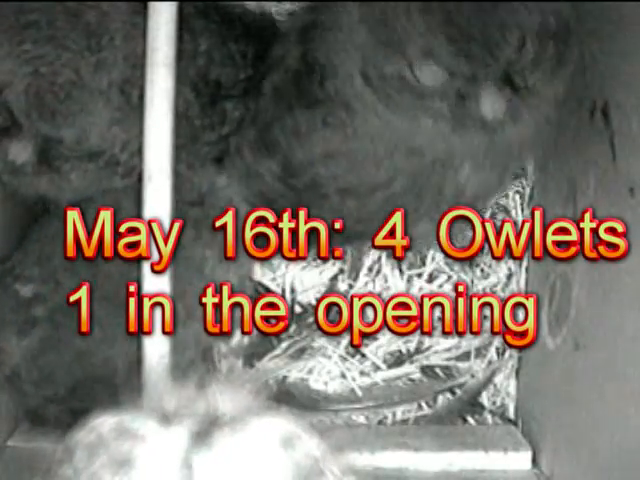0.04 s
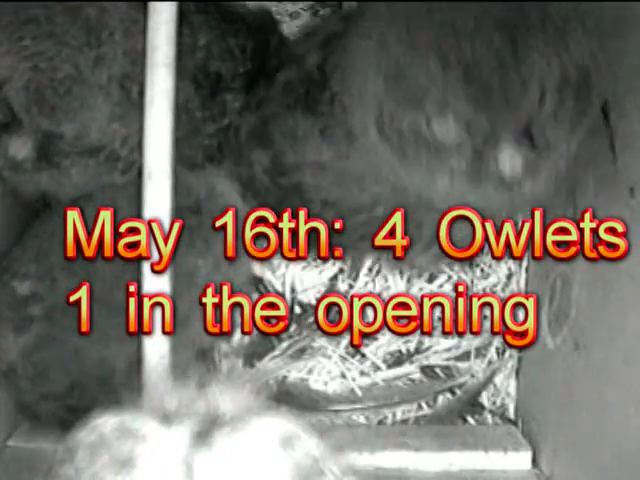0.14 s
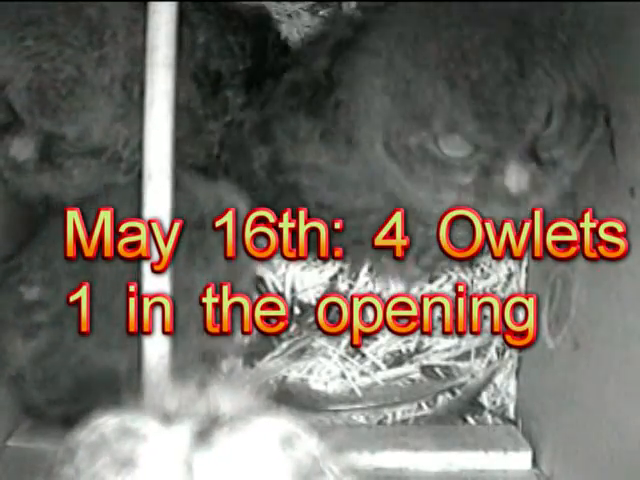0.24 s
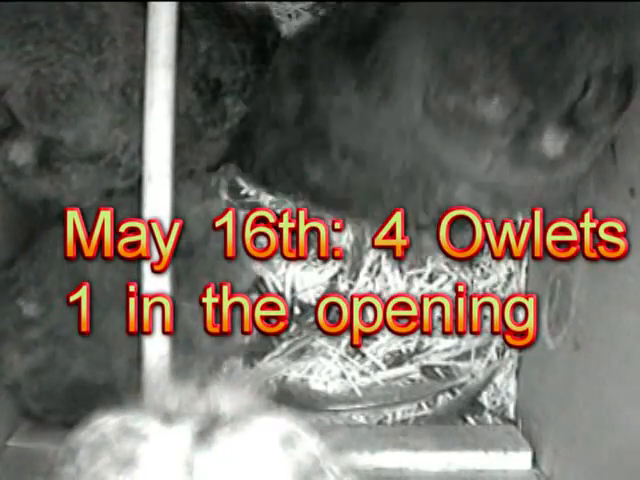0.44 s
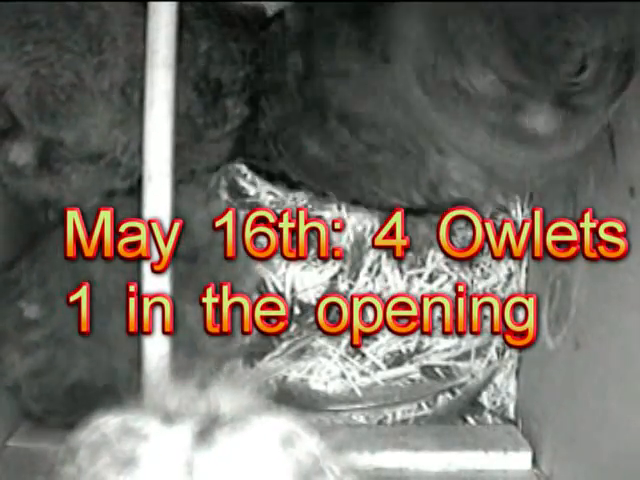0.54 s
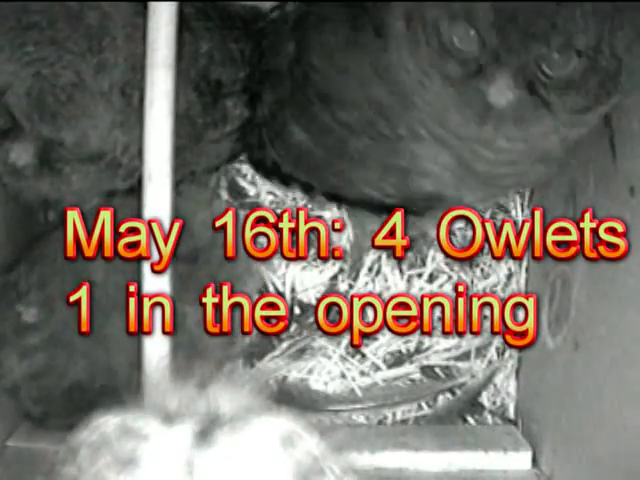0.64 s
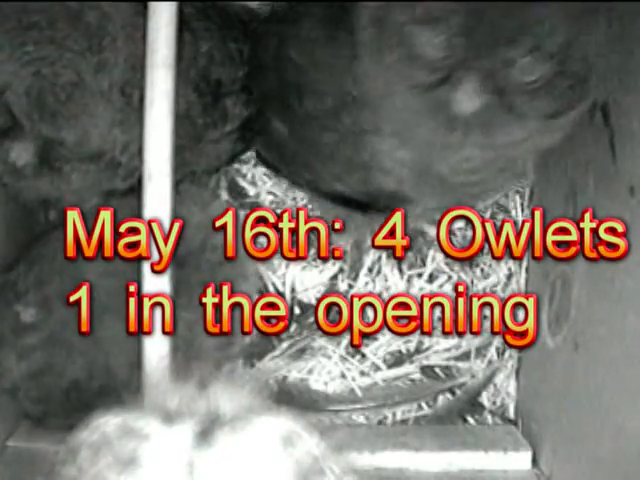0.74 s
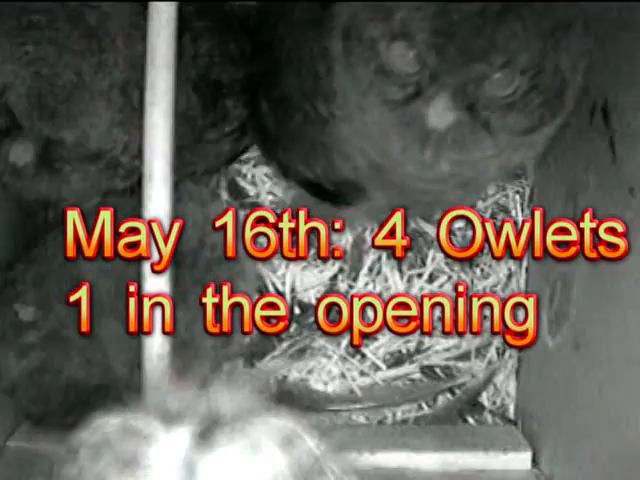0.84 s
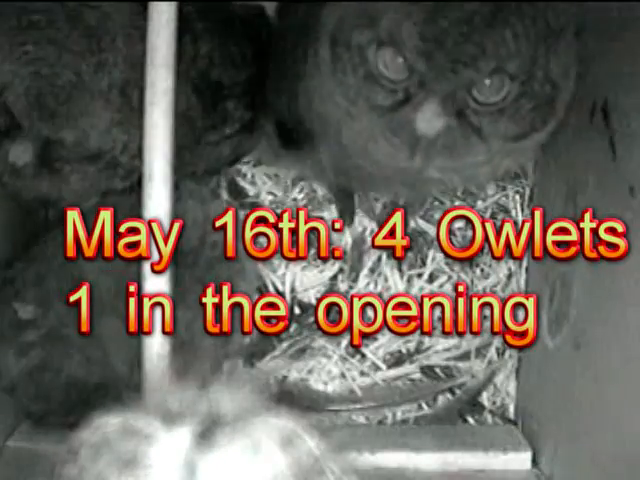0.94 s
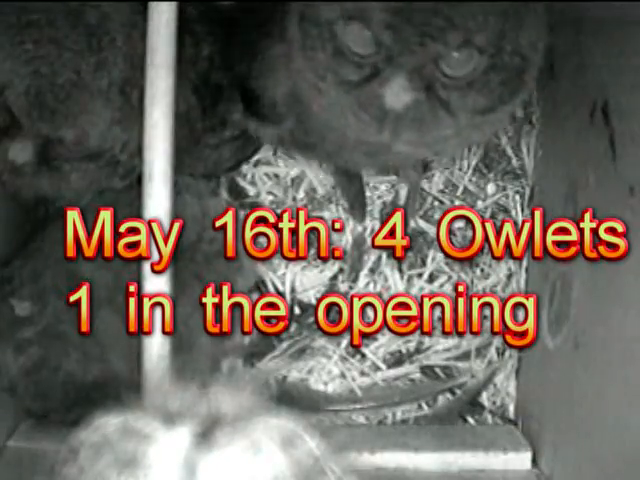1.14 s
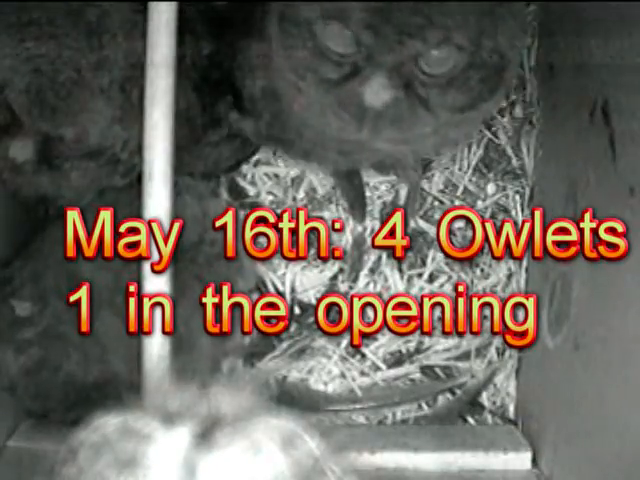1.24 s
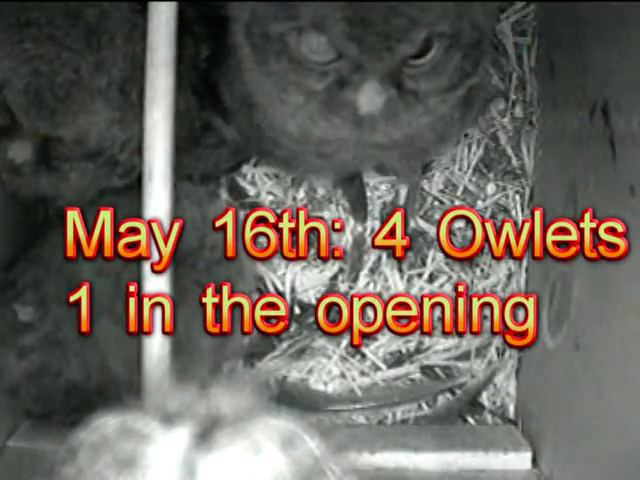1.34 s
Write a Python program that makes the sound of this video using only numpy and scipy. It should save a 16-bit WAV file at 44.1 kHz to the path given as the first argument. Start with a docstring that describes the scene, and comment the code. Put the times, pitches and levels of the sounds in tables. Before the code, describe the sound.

A young owl gives one loud, hoarse call in a small wooden nest box, jumping up in pitch, holding, then cracking downward and stopping abruptly; faint bedding ticks, hiss, buzz and low rumble remain, right channel only.

```python
"""From the start, low outdoor rumble, amplifier hiss and the camera's field buzz (filtered clicks) are heard.
A bedding tick, a short noise burst, precedes an owlet's hoarse call in a small wooden nest box at night.
The call, an overtone series mixed with pulsing breath, rises, then sags; resonators are the box's air modes.
Brief surges push it at the microphone's ceiling; more ticks fall during and after the call.
The microphone feeds the right channel; the left holds only circuit noise, filtered at random."""
import sys
import numpy as np
from scipy import signal
from scipy.fft import rfft, irfft
from scipy.io import wavfile

SR = 44100
rng = np.random.default_rng(int(sys.argv[2]) if len(sys.argv) > 2 else 0)


def generate_wav(signal):
    """Clip the signal to [-1, 1] and save it as 16-bit WAV at the path in sys.argv[1]."""
    frames = np.transpose(np.atleast_2d(signal))
    scaled = np.clip(frames, -1, 1) * 32767
    pcm = np.round(scaled).astype(np.int16)
    wavfile.write(sys.argv[1], SR, pcm)


def volts(x):
    """Linear amplitude factor 10**(x/20) for a level x in dB, scalar or array-like."""
    e = np.asarray(x, float) / 20
    return 10 ** e


N = 61739  # samples

# Course of the call: (time [s], pitch [Hz], effort [dB], breath re tone [dB], overtone boost [dB])
CALL = [(0.193, 588.5, -12.5, -22, -11), (.203, 594.3, -29, -2.5, -4), (.208, 939.7, -18.5, -7, -2.5),
        (.225, 988, -23, -5, -10), (.243, 1068, -24, -8, 5), (0.258, 935, -22, -2, -14),
        (0.387, 1057, -17, -9.5, -3), (.415, 1005, -14.5, -16, -1.5), (0.443, 1100, -19.5, -5, -2),
        (0.469, 1002, -14.5, -9.5, 1.5), (0.522, 1025, -15.5, -6, 1), (.568, 1000, -15.5, -7.5, 5),
        (.581, 1037, -17, -11.5, 5), (.594, 960, -14.5, -4, 3.5), (.7, 930, -15, -4, 2),
        (.714, 900, -19, 1.5, 6), (.756, 820, -19, 0, 2), (.775, 702.3, -11.5, -7, -0.5),
        (.795, 690.4, -14.5, -6.5, 6.5), (.812, 620.6, -15.5, -4, -1.5), (.858, 600, -14, -6, 1),
        (.888, 585, -10, -10.5, -3), (0.899, 517.7, -13, -10, 6), (.954, 503, -16.5, -9.5, 6.5),
        (0.961, 489.4, -55, -1, 15.5)]
# Harmonic series of the voice, before the boost: (multiple of the pitch [1], level [dB])
OVERTONES = [(1, 4.5), (2, -10.5), (3, -19), (4, -21.5), (5, -29)]
# Roughness as the voice cracks, dropping a register: (time [s], rms pitch jitter [share of pitch])
ROUGHNESS = [(.2, .02), (.26, .032), (.37, .028), (.41, .015), (.45, .03), (.69, .04), (.715, .11),
             (.8, .08), (.82, .055), (.89, .06), (.91, .045)]
# Short pushes of air against the microphone's ceiling: (time [s], added level [dB])
SURGES = [(.607, 4), (.668, 4), (.849, 4)]
# Breath spectrum: (frequency [Hz], relative density [dB per Hz])
BREATH_SPECTRUM = [(150, -23), (400, -2.5), (900, 1.5), (1500, -11.5), (2500, -8), (3000, -23.5),
                   (4000, -29), (6000, -65)]
# Air modes of the box: (frequency [Hz], width before its lower limit [Hz], level [dB])
BOX_MODES = [(330.5, 21.2, 2.5), (524, 70, 0), (622.2, 49.4, 2.5), (960, 104.4, 2.5), (1231, 110, 0),
             (1482, 46, 7), (1859, 111, 2), (2395, 297, 0), (3570, 240, -6)]
# Bedding ticks: (time [s], noise rms at onset before microphone gain [dB])
RUSTLES = [(0.132, -37), (0.5424, -43), (1.0547, -42.5), (1.1574, -43), (1.303, -38), (1.3083, -40)]
# Spectrum of a bedding tick: (frequency [Hz], relative density [dB per Hz])
SHAVINGS_SPECTRUM = [(1000, -11), (3000, -1), (9000, -4), (16000, -7)]
# Outdoor rumble spectrum: (frequency [Hz], relative density [dB per Hz])
RUMBLE_SPECTRUM = [(15, -56), (25, -15.5), (43, -47), (59, -6.5), (92, -10.5), (119, 1.5), (141, -5.5),
                   (162, -24), (202, -14.5), (248, -21.5), (266, -11.5), (300, -10.5), (338, 2.5),
                   (394, -18.5), (546, -18), (659, -23), (796, -16.5), (852, -28), (913, -14), (977, -20.5),
                   (1500, -34), (1950, -59), (3300, -120)]
# Amplifier hiss spectrum: (frequency [Hz], relative density [dB per Hz])
HISS_SPECTRUM = [(710, -20), (1200, -6.5), (1470, 1), (2120, -2.5), (5800, -6.5), (9290, -11),
                 (10200, -17.5), (11500, -8), (14600, -18), (15500, -26)]
# Circuit noise spectrum of the unused channel: (frequency [Hz], relative density [dB per Hz])
IDLE_SPECTRUM = [(20, -6), (60, 5), (200, -14), (1000, -16), (9000, -19), (10500, -35), (15000, -40),
                 (16000, -26)]

JITTER_TOP_HZ, SHIMMER_TOP_HZ = 150, 120  # fastest drift of pitch and of tone level
SHIMMER = .33  # rms share of the tone's amplitude
PULSED = .65  # depth of the breath's puff once a cycle
THROAT_TOP_HZ = 2670
ATTACK_S, SURGE_S = .004, .004
RELEASE_LEAD_S, RELEASE_DECAY_S = .006, .003  # start before the last point; time constant
DIRECT_DB = -10
NARROWEST = .045  # least mode width as a share of its frequency
RUSTLE_DECAY_S = .002
FIELD_HZ, FIELD_START_S = 59.94, .0154
BUZZ_DB, ODD_FIELD_DB, BUZZ_SPREAD_DB = -27.5, -4, 1.2  # click before filter and gain; offset; deviation
BUZZ_LOW_HZ, BUZZ_HIGH_HZ = 2500, 12000
RUMBLE_DB, HISS_DB = -39, -49.5  # rms before microphone gain
IDLE_DB = -88  # rms
MIC_DB = 6
CEILING = .995  # of full scale


def owlet():
    """Source and filter: an unsteady syrinx tone and breath puffing each cycle excite the box."""
    t = np.arange(N) / SR
    s, hz, effort_db, breath_db, boost_db = np.transpose(CALL)
    jitter = np.interp(t, *np.transpose(ROUGHNESS)) * wander(JITTER_TOP_HZ)
    pitch = np.interp(t, s, hz) * (1 + jitter)
    phase = 2 * np.pi * np.cumsum(pitch) / SR

    boost = np.interp(t, s, boost_db)
    tone = np.zeros(N)
    for k, db in OVERTONES:
        level_db = db + (k > 1) * boost  # the fundamental is not boosted
        tone = tone + volts(level_db) * np.cos(k * phase)
    tone = tone * (1 + SHIMMER * wander(SHIMMER_TOP_HZ))
    throat = signal.butter(4, THROAT_TOP_HZ, fs=SR, output="sos")
    tone = signal.sosfilt(throat, tone)

    puffs = 1 + PULSED * np.cos(phase)
    breath = coloured(puffs * rng.standard_normal(N), BREATH_SPECTRUM)
    voice = evened(tone) + volts(np.interp(t, s, breath_db)) * breath

    attack = np.clip((t - s[0]) / ATTACK_S, 0, 1) ** 2
    release = np.exp(-np.maximum(t - s[-1] + RELEASE_LEAD_S, 0) / RELEASE_DECAY_S)
    surge_db = sum(db * np.exp(-((t - at) / SURGE_S) ** 2) for at, db in SURGES)
    effort = volts(np.interp(t, s, effort_db) + surge_db)
    return box(attack * release * effort * voice)


def box(x):
    """Modal superposition: direct sound plus resonant air modes, neighbours in opposite sign."""
    out = volts(DIRECT_DB) * x
    for k, (hz, width, db) in enumerate(BOX_MODES):
        quality = hz / max(width, NARROWEST * hz)
        mode = signal.lfilter(*signal.iirpeak(hz, quality, fs=SR), x)
        out = out + (-1) ** k * volts(db) * mode
    return out


def rustles():
    """Impulsive friction: noise bursts decay exponentially as feet shift the shavings."""
    t = np.arange(N) / SR
    shape = np.zeros(N)
    for s, db in RUSTLES:
        shape = shape + volts(db) * (t >= s) * np.exp(-np.abs(t - s) / RUSTLE_DECAY_S)
    return shape * coloured(rng.standard_normal(N), SHAVINGS_SPECTRUM)


def buzz():
    """Periodic impulses: one band-limited click per video field, every second one weaker on average."""
    at = np.arange(FIELD_START_S, N / SR, 1 / FIELD_HZ)
    alternation_db = ODD_FIELD_DB * (np.arange(len(at)) % 2)
    spread_db = BUZZ_SPREAD_DB * rng.standard_normal(len(at))
    clicks = np.zeros(N)
    clicks[(at * SR).astype(int)] = volts(BUZZ_DB + alternation_db + spread_db)
    band = signal.butter(1, [BUZZ_LOW_HZ, BUZZ_HIGH_HZ], "band", fs=SR)
    return signal.lfilter(*band, clicks)


def rumble():
    """Stationary random noise: the outdoor rumble, concentrated at low frequencies."""
    return volts(RUMBLE_DB) * coloured(rng.standard_normal(N), RUMBLE_SPECTRUM)


def hiss():
    """Stationary random noise: the amplifier's hiss with its spectral envelope."""
    return volts(HISS_DB) * coloured(rng.standard_normal(N), HISS_SPECTRUM)


def circuit_noise():
    """Stationary random noise: the faint circuit noise of the unused channel."""
    return volts(IDLE_DB) * coloured(rng.standard_normal(N), IDLE_SPECTRUM)


def evened(x):
    """Normalization of mean power: scales x to rms 1."""
    return x / np.sqrt(np.mean(x ** 2) + 1e-20)


def coloured(x, points):
    """Spectral weighting: shapes x along a log-frequency axis, rms 1."""
    f, db = np.transpose(points)
    hz = np.fft.rfftfreq(len(x), 1 / SR)
    weight = volts(np.interp(np.log(hz + 1), np.log(f + 1), db))
    return evened(irfft(rfft(x) * weight, len(x)))


def wander(top_hz):
    """Low-pass random process: drift with rates mainly up to top_hz, rms 1."""
    lowpass = signal.butter(2, top_hz, fs=SR)
    return evened(signal.lfilter(*lowpass, rng.standard_normal(N)))


def scene():
    """Linear superposition: all sources add in the right channel; the left is silent."""
    background = rumble() + hiss()
    right = owlet() + background + buzz() + rustles()
    return np.array([np.zeros(N), right])


def top_cut(x):
    """Nothing passes above the cut-off."""
    return signal.sosfilt(signal.butter(12, 15690, fs=SR, output="sos"), x)


def record(dry):
    """Amplitude limiting: microphone gain meets a hard ceiling; circuit noise fills the left channel."""
    idle = circuit_noise()
    limited = np.clip(volts(MIC_DB) * dry, -CEILING, CEILING)
    mix = limited + np.array([idle, np.zeros(N)])
    return top_cut(mix)


dry = scene()
out = record(dry)
generate_wav(out)
```